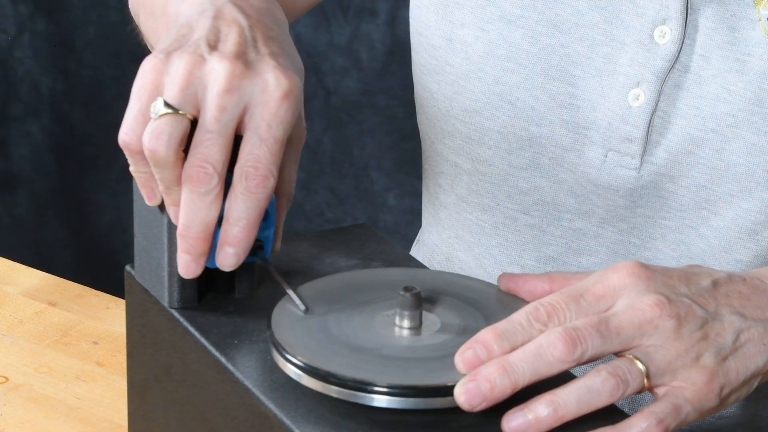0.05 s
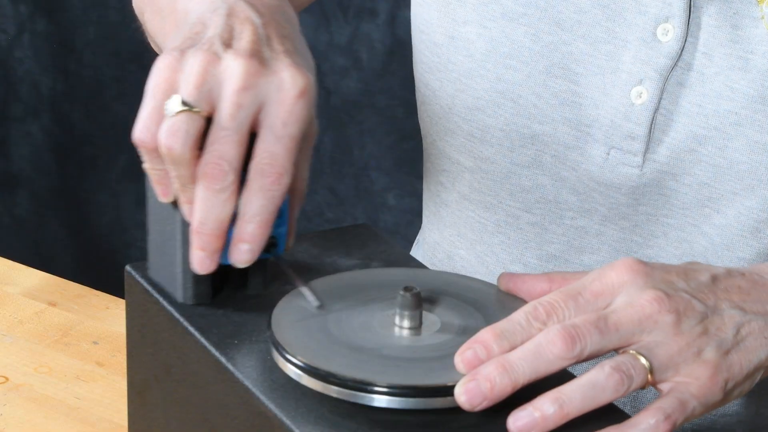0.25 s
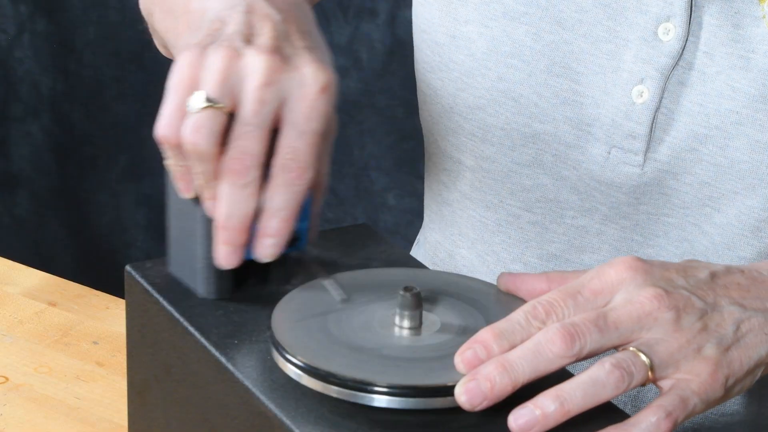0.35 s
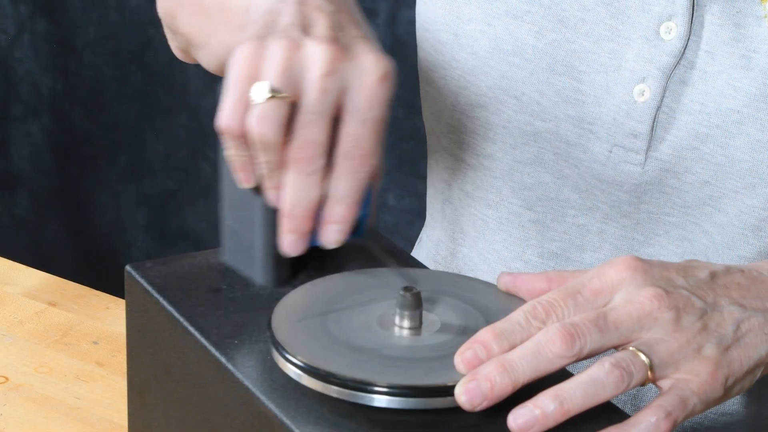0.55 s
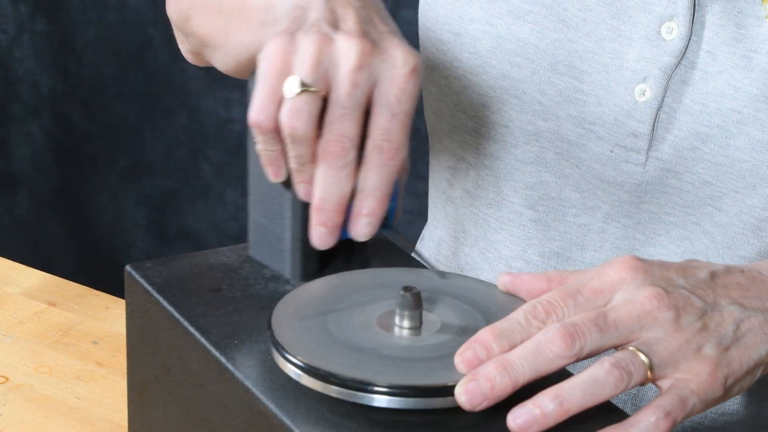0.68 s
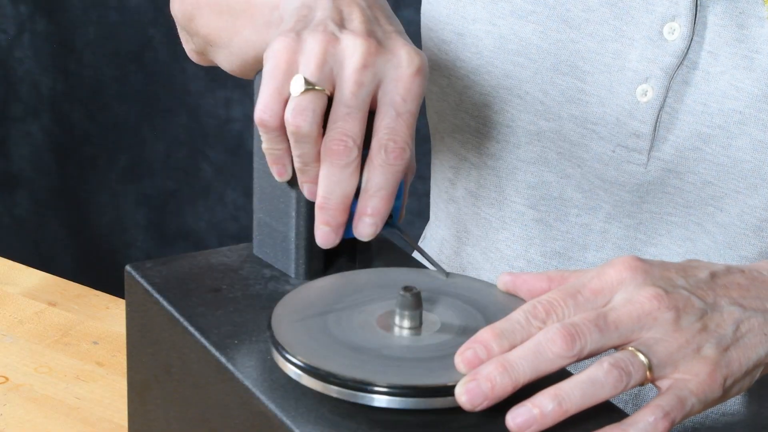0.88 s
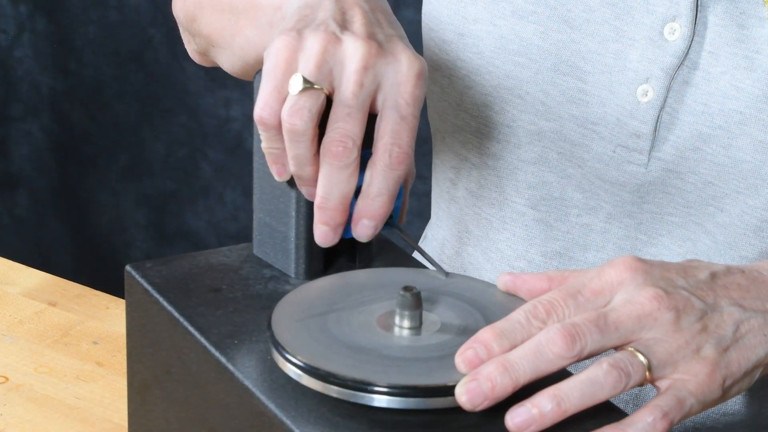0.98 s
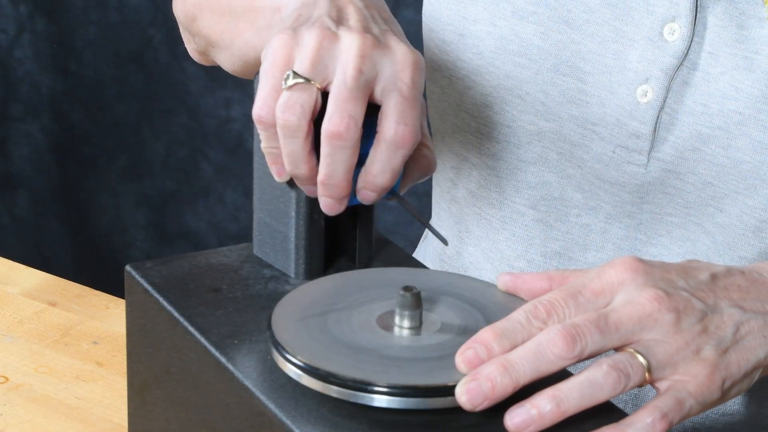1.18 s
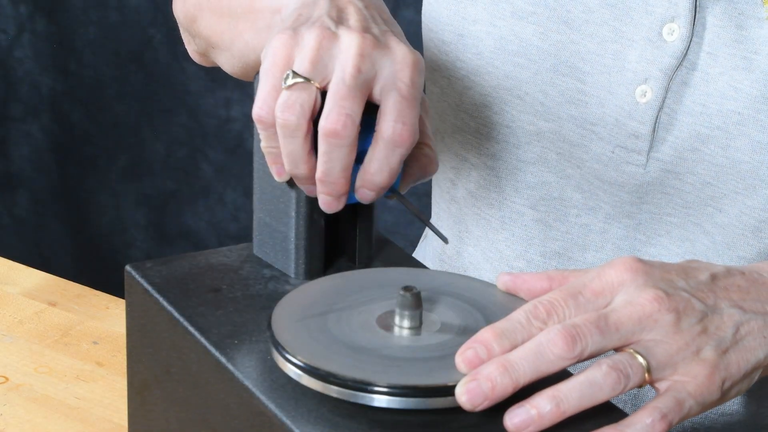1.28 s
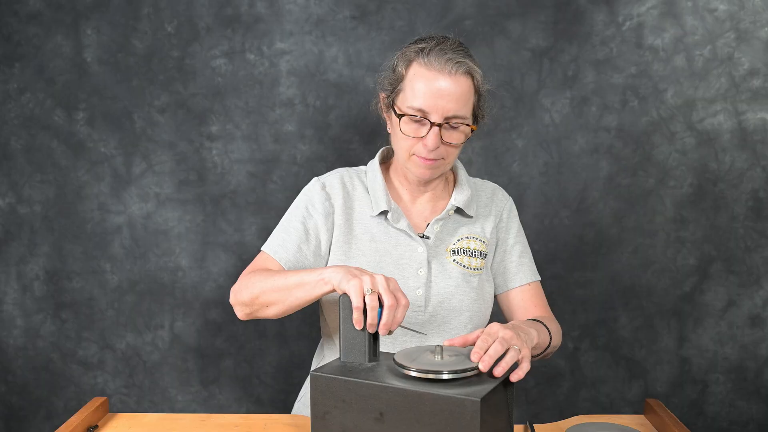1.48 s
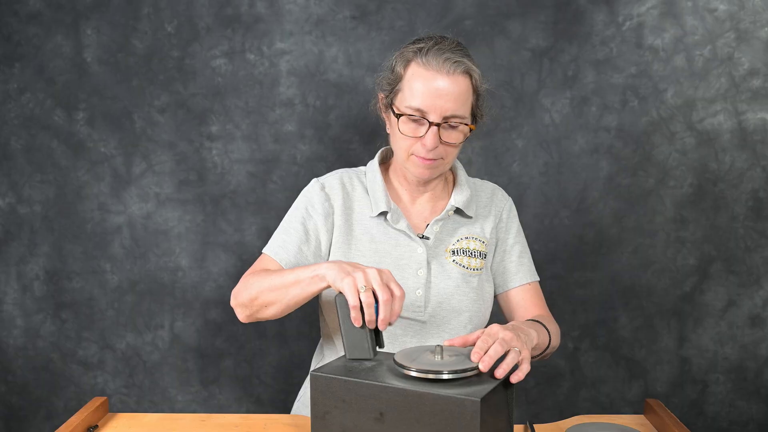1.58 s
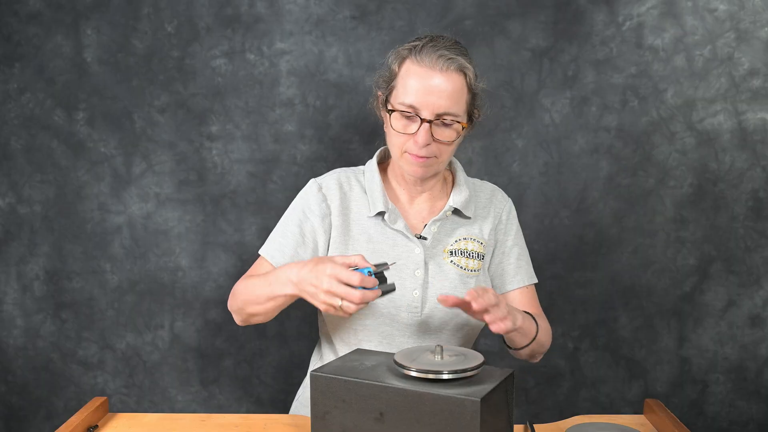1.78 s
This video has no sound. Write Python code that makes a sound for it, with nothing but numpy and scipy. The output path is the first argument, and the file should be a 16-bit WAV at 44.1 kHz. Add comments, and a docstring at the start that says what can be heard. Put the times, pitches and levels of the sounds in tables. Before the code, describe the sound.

A small steel tool scrapes once across a sharpener's abrasive plate with a gritty, metallic rasp. Its holder is then set down with a clack and bumps softly as it is lifted, heard close in a small workshop.

```python
"""A small steel tool in a hand-held fixture is drawn once across the abrasive plate of a bench sharpener. Grit
plucks the tool, whose resonances shift along the stroke, and shakes the housing beneath. The fixture bumps and
is set down with a clack; the tool rings briefly as it is lifted off. One microphone, close to the bench, in a
small workshop with soft air noise and a faint hum."""
import sys
import numpy as np
from scipy import signal
from scipy.fft import rfft, irfft
from scipy.io import wavfile

SR = 44100
rng = np.random.default_rng(int(sys.argv[2]) if len(sys.argv) > 2 else 0)


def waveform_to_disk(signal):
    """Save audio, clipped to [-1, 1], as 16-bit WAV at the path in sys.argv[1]."""
    frames = np.transpose(np.atleast_2d(signal))
    scaled = np.clip(frames, -1, 1) * 32767
    samples = np.round(scaled).astype(np.int16)
    wavfile.write(sys.argv[1], SR, samples)


N = 81585


def undb(db):
    """Decibels to gain."""
    return 10 ** (np.asarray(db) / 20)


def unit(x):
    """Scale to an rms of 1."""
    return x / np.sqrt(np.mean(x ** 2))


def unit_energy(response):
    """Scale an impulse response to an energy of 1."""
    return response / np.linalg.norm(response)


def times():
    """Time of every sample."""
    return np.arange(N) / SR


def curve(points):
    """Gain along (time [s], level [dB]) points, silent outside them."""
    return undb(np.interp(times(), *np.array(points).T, left=-150, right=-150))


def on_log_axis(hz, points):
    """Read (frequency [Hz], value) points at these frequencies."""
    point_hz, values = np.array(points).T
    return np.interp(np.log(hz + 1), np.log(point_hz), values)


def noise(colour):
    """Noise with an rms of 1, coloured by (frequency [Hz], level [dB]) points."""
    gain = undb(on_log_axis(np.fft.rfftfreq(N, 1 / SR), colour))
    return unit(irfft(rfft(rng.standard_normal(N)) * gain, N))


def walk(hz):
    """Smooth random wandering with a spread of 1."""
    return unit(np.interp(times() * hz, np.arange(N), rng.standard_normal(N)))


def swell(t, rise_s):
    """A push that peaks at 1 after rise_s and dies away."""
    u = np.maximum(t, 0) / rise_s
    return u * np.exp(1 - u)


def roughen(force):
    """Rough contact: random signs turn a smooth force into noise."""
    return force * rng.choice([-1, 1], N)


def butterworth(x, kind, hz, order):
    """Low-pass or high-pass a sound."""
    return signal.sosfilt(signal.butter(order, hz, kind, fs=SR, output="sos"), x)


def through(x, response):
    """Pass a sound through an impulse response."""
    return signal.fftconvolve(x, response)[:N]


def resonator(rows, floor_db, size=8192):
    """Response of steep (frequency [Hz], width [Hz], level [dB]) resonances over a flat floor."""
    hz = np.fft.rfftfreq(size, 1 / SR)
    peaks = [undb(db) / (1 + (2 * (hz - centre) / width) ** 2) for centre, width, db in rows]
    power = undb(floor_db) ** 2 + sum(peak ** 2 for peak in peaks)
    cepstrum = irfft(np.log(power) / 2)
    cepstrum[1:size // 2] *= 2  # folding the cepstrum makes the response causal
    cepstrum[size // 2 + 1:] = 0
    return unit_energy(irfft(np.exp(rfft(cepstrum))))


# workshop air all around the microphone (frequency [Hz], relative level [dB])
AIR_COLOUR = [(22, -17), (40, -0.5), (60, -5), (100, -7), (200, -17), (450, -28), (800, -21), (1500, -27.5),
              (4000, -35.5), (9000, -36), (15500, -36)]
# steady hum in the room (frequency [Hz], level [dB])
HUM_TONES = [(678, -78), (850, -82)]
# low drone while the hands move (time [s], level [dB])
DRONE_LEVEL = [(0, -99), (.14, -63.5), (.45, -64), (.72, -64), (.8, -67), (.9, -81), (1.0, -74),
               (1.1, -65.5), (1.35, -61.5), (1.6, -64.5), (1.7, -72), (1.85, -68)]


def room_tone(air_db=-67, drone_hz=60):
    """Soft air noise, a faint steady hum and a low wavering drone."""
    t = times()
    hum = sum(undb(db) * np.sin(2 * np.pi * (hz * t + rng.random())) for hz, db in HUM_TONES)
    drone = curve(DRONE_LEVEL) * np.sin(2 * np.pi * drone_hz * t + 0.42 * walk(hz=8.3))
    return undb(air_db) * noise(AIR_COLOUR) + np.sqrt(2) * (hum + drone)


# reverberation of the small workshop (frequency [Hz], t60 [s])
WORKSHOP_DECAY = [(150, 0.54), (500, 0.2), (2000, 0.19), (5000, 0.18), (14000, 0.085)]


def workshop(direct, bench_db=-11.5, tail_db=-12.5, tail_delay_s=0.0042):
    """The microphone gets the direct sound, quick reflections off the bench, then a short room tail."""
    t = times()[:SR // 2]
    hz, frame_s, spectrum = signal.stft(rng.standard_normal(len(t)), SR, nperseg=256)
    fade = undb(-60 * frame_s / on_log_axis(hz, WORKSHOP_DECAY)[:, None])
    tail = signal.istft(spectrum * fade, SR)[1][:len(t)] * (t > tail_delay_s)
    bench = rng.standard_normal(len(t)) * swell(t, rise_s=0.00353)
    reflections = undb(bench_db) * unit_energy(bench) + undb(tail_db) * unit_energy(tail)
    return direct + through(direct, reflections)


# hands moving the fixture at the bench (time [s], level [dB])
HANDLING_LEVEL = [(1.1, -49), (1.2, -56.5), (1.28, -68.5), (1.38, -71.5), (1.44, -73.5), (1.5, -68),
                  (1.62, -64.5), (1.82, -80)]
# dull rustle of those hands (frequency [Hz], relative level [dB])
RUSTLE_COLOUR = [(30, -3), (58, -2.5), (110, -20), (250, -6.5), (420, -4), (900, -15.5), (2000, -23.5),
                 (5000, -42.5), (14000, -45.5)]


def handling(flutter_db=2.5):
    """Hands make a low, uneven rustle as they move the fixture."""
    return curve(HANDLING_LEVEL) * noise(RUSTLE_COLOUR) * undb(flutter_db * walk(hz=40))


# free ring of the steel tool as it is lifted (frequency [Hz], level [dB], t60 [s])
LIFT_MODES = [(857, -47.5, 0.11), (1066, -47, 0.14), (2050, -55, 0.17)]


def lift(start_s=1.558):
    """The tool rings briefly as it comes free."""
    age = np.maximum(times() - start_s, 0)
    return sum(undb(db - 60 * age / t60) * np.sin(2 * np.pi * hz * age) for hz, db, t60 in LIFT_MODES)


# modes of the sharpener's housing on the bench (frequency [Hz], relative level [dB], t60 [s])
HOUSING_MODES = [(163, -22.5, 0.07), (247, -17.5, 0.1), (343, -3.5, .05), (391.5, 0.5, .075),
                 (459, -1.5, 0.072), (570.7, -2.5, .05), (674, -2.5, .06), (787, -5.5, 0.027),
                 (876, -8, .05)]


def housing_ring():
    """A tap sets the housing's damped modes ringing with alternating signs; peak 1."""
    t = times()[:SR // 2]
    ring = sum((-1) ** k * undb(db - 60 * t / t60) * np.sin(2 * np.pi * hz * t)
               for k, (hz, db, t60) in enumerate(HOUSING_MODES))
    return ring / np.abs(ring).max()


# fingers and fixture scuffing (frequency [Hz], relative level [dB])
SCUFF_COLOUR = [(200, -44), (1000, 10.5), (2500, 4.5), (4500, 3), (7000, -8.5), (9500, -8), (12000, -10.5),
                (15500, -53)]
# resonances of the fixture (frequency [Hz], width [Hz], relative level [dB])
FIXTURE_RESONANCES = [(165, 35, -12), (250.5, 50, -7), (384, 45, 1.5), (686, 330, 0.5), (1244, 280, -5),
                      (1521, 110, 4.5), (1647, 130, 0.5), (1950, 100, -10), (1988, 340, 3), (2357, 400, -5),
                      (2743, 260, -6.5), (3400, 650, -19.5), (4540, 600, -23.5)]
# bumps of the fixture on the housing, close to the microphone
# (time [s], thump pitch [Hz], thump [dB], housing ring [dB], clack [dB], scuff [dB], contact rise [s])
BUMPS = [(.081, 404, -38.5, -68, -64, -86, 0.00096), (.1225, 668, -40.5, -42.5, -55, -56.5, 0.0036),
         (.141, 457, -75, -48, -57, -60.5, 0.0041), (0.166, 437, -51, -49, -61, -64.5, 0.0048),
         (0.1906, 449.6, -44, -40, -60, -62, .0015), (0.9384, 455, -34, -59, -57, -70.5, 0.0029),
         (1.0817, 403, -26.5, -34, -27.5, -44, 0.0031), (1.089, 600, -44, -48, -30.5, -57, 0.0021),
         (1.097, 597, -58, -50, -29, -48, 0.0053), (1.116, 444, -71, -54, -44.5, -52.5, 0.01),
         (1.14, 427, -45, -51, -46.5, -63, 0.003), (1.32, 400, -44.5, -65, -60.5, -71.5, 0.0017),
         (1.462, 449, -65, -49.5, -60, -70, 0.0069), (1.542, 450, -59, -51, -62, -62, 0.004),
         (1.5532, 403, -30, -50, -59, -55, 0.0049), (1.562, 456, -49, -45, -55, -84, 0.0066),
         (1.648, 450, -69, -68, -76, -67.5, 0.0027), (1.707, 457, -76, -78, -60, -59.5, 0.0047)]


def fixture_bumps(thump_rise_s=0.0038, tail_rise_s=0.0098, tail_db=-16):
    """Each bump thumps and rings the housing; its rough contact makes the fixture clack and scuff."""
    t, ring, scuff = times(), housing_ring(), noise(SCUFF_COLOUR)
    thumps = rings = scuffs = clack_force = 0
    for start_s, hz, thump_db, ring_db, clack_db, scuff_db, contact_rise_s in BUMPS:
        age = np.maximum(t - start_s, 0)
        contact = swell(age, contact_rise_s)
        push = swell(age, thump_rise_s) ** 2 + undb(tail_db) * swell(age, tail_rise_s) ** 2
        thumps += undb(thump_db) * push * np.sin(2 * np.pi * hz * age)
        rings += undb(ring_db) * np.interp(age, t[:len(ring)], ring, right=0)
        scuffs += undb(scuff_db) * contact * scuff
        clack_force += undb(clack_db) * contact
    clacks = through(roughen(clack_force), resonator(FIXTURE_RESONANCES, floor_db=-46.5))
    return butterworth(thumps, "high", hz=260, order=2) + rings + scuffs + clacks


# coarse grains along the plate (time [s], relative level [dB])
COARSE_GRAINS = [(0.1903, -2), (0.1972, -7.5), (0.2245, 5.5), (.273, 7), (0.348, -2.5), (0.478, -0.5),
                 (0.5135, -10), (0.537, -4), (.562, 6), (0.6996, 7.5)]


def catches(rise_s=0.00135):
    """Coarse grains catch the edge, each with a short, rough jolt."""
    jolts = sum(undb(db) * swell(times() - start_s, rise_s) for start_s, db in COARSE_GRAINS)
    return butterworth(roughen(jolts), "low", hz=4500, order=1)


def grit(grains_per_s=14000, spread_db=2.95):
    """Fine grains pluck the edge at random, a few much harder than the rest."""
    hits = rng.random(N) < grains_per_s / SR
    plucks = hits * rng.standard_normal(N)
    strength = undb(spread_db * np.minimum(rng.exponential(size=N), 5))
    return unit(plucks * strength)


# resonances of the steel tool on the plate, with relative levels at three points of the stroke
# (mid-stroke frequency [Hz], width [Hz], early level [dB], middle level [dB], late level [dB])
TOOL_RESONANCES = [(1166, 280, -10.5, -13, -13), (1600, 290, -8.5, -16, -17), (1961, 290, -3.5, -13, -9.5),
                   (2072, 220, -2, 6, -3), (2250, 360, 2.5, -14.5, -6), (2715, 410, -17, 0.5, -10),
                   (2984, 260, -5.5, -9.5, -13), (3500, 280, -10.5, -4, 0.5), (3854, 260, -1.5, 2.5, -2),
                   (3800, 190, 3.5, -15, -20), (4307, 205, 1.5, -10, -10.5), (4605, 230, -9, -10, -14),
                   (4953, 300, -5, -12, -13.5), (5350, 600, -14, -26, -22), (6400, 1250, -20, -13, -17.5),
                   (6850, 370, -9.5, -33, -20.5), (7520, 520, -14, -19.5, -20),
                   (10480, 1480, -25, -22.5, -29.5), (12000, 1400, -29, -22.5, -33),
                   (12560, 700, -24, -25.5, -18.5), (13400, 1100, -25, -41, -42.5)]
EARLY_MIDDLE_LATE_S = [0.3, 0.56, 0.65]


def tool_ring(drive, moments_s, sag_per_s=0.025):
    """The plucked tool rings; its resonances sink slightly and change balance as the edge travels."""
    ring = 0
    for moment_s, weights in zip(moments_s, np.eye(len(moments_s))):
        tuning = 1 - sag_per_s * (moment_s - moments_s.mean())
        resonances = [(hz * tuning, width, np.interp(moment_s, EARLY_MIDDLE_LATE_S, levels))
                      for hz, width, *levels in TOOL_RESONANCES]
        crossfade = np.interp(times(), moments_s, weights)
        ring += through(drive * crossfade, resonator(resonances, floor_db=-39.5))
    return ring


# pressure of the tool on the plate, close to the microphone (time [s], relative level [dB])
STROKE_PRESSURE = [(.19, -26), (.201, -7.5), (.212, -0.5), (.29, -1), (.35, 2.5), (.44, 1), (.55, 3),
                   (.62, -.5), (.67, -0.5), (.71, -.5), (.742, -9), (.77, -29.5)]


def sharpening_stroke(tool_db=-32.5, shake_db=-39.5, shake_db_per_s=-3, chatter_db=1):
    """Grit and catches ring the tool; the drag shakes the housing, less as the stroke goes on."""
    plucks = grit()
    force = curve(STROKE_PRESSURE) * undb(chatter_db * walk(hz=140.7))
    drive = butterworth(plucks * force, "low", hz=14100, order=4) + catches()
    moments_s = np.linspace(STROKE_PRESSURE[0][0], STROKE_PRESSURE[-1][0], num=9)
    drag = roughen(force) * undb(shake_db + shake_db_per_s * (times() - moments_s.mean()))
    return undb(tool_db) * tool_ring(drive, moments_s) + through(drag, unit_energy(housing_ring()))


def scene():
    """The work at the bench, heard in mono from close by, over the room tone."""
    at_bench = handling() + sharpening_stroke() + fixture_bumps() + lift()
    return (workshop(at_bench) + room_tone())[None]


def record(dry):
    """The recorder cuts the treble steeply above 15.7 kHz."""
    return signal.sosfilt(signal.ellip(10, .2, 70, 15700, fs=SR, output="sos"), dry)


dry = scene()
out = record(dry)
waveform_to_disk(out)
```